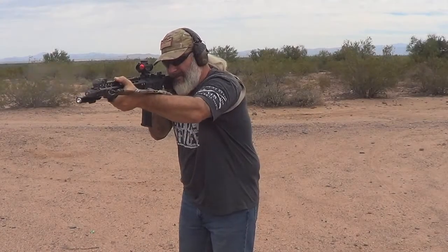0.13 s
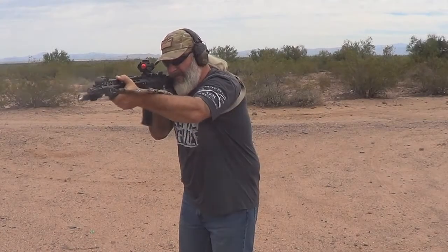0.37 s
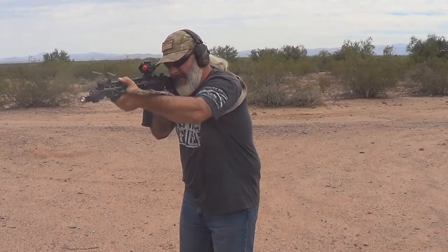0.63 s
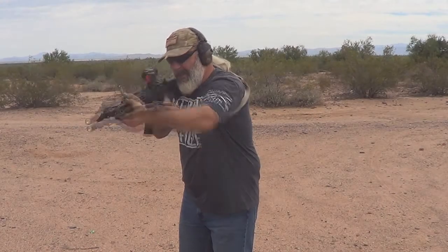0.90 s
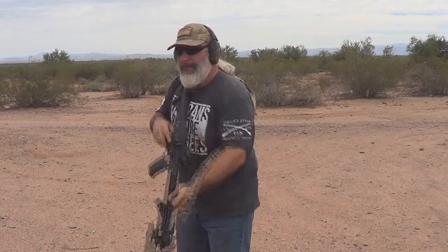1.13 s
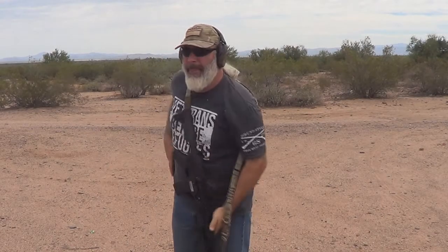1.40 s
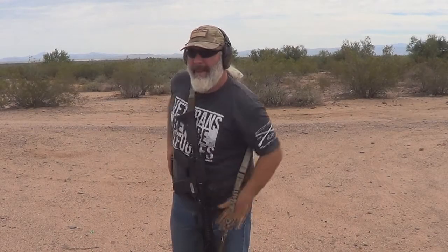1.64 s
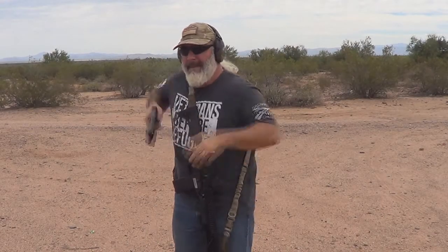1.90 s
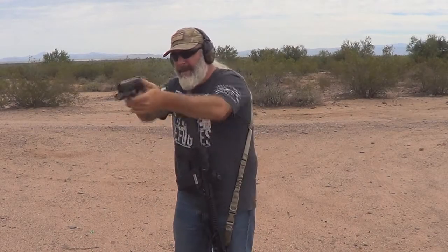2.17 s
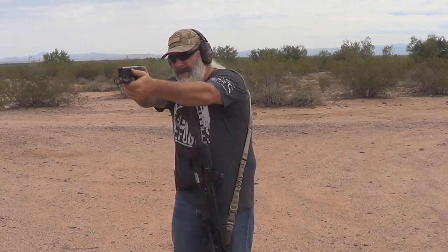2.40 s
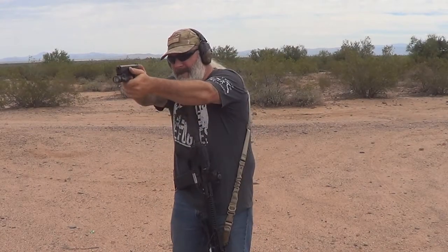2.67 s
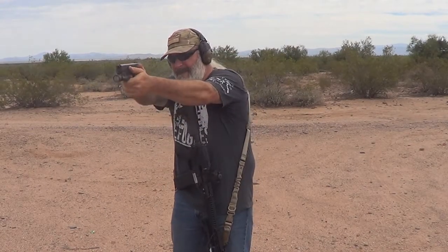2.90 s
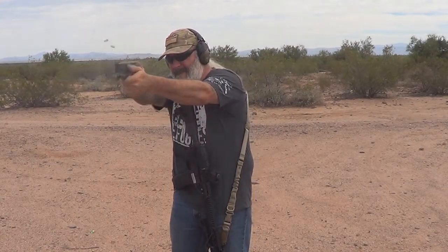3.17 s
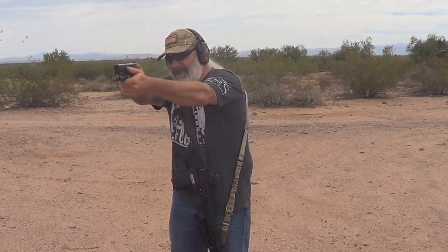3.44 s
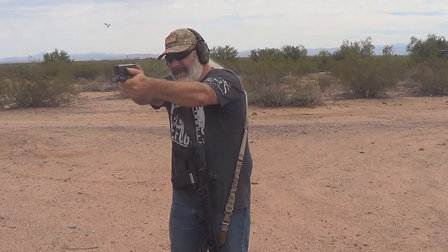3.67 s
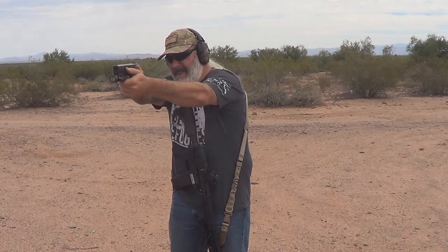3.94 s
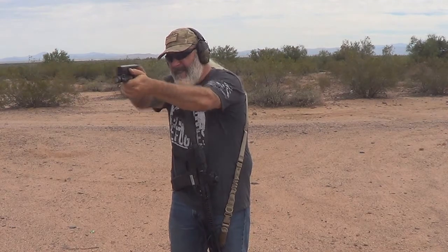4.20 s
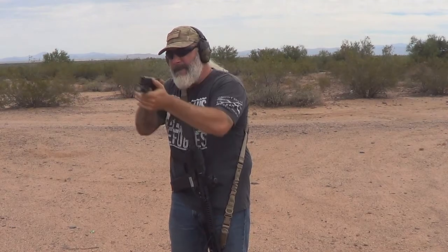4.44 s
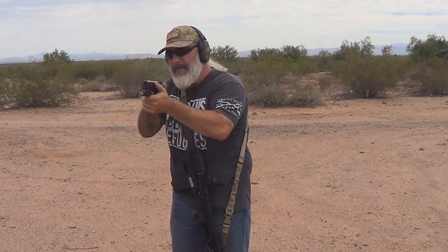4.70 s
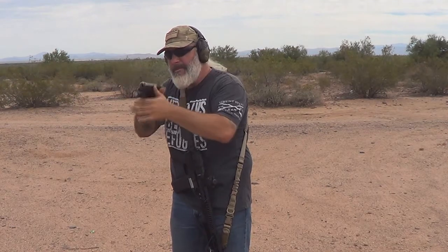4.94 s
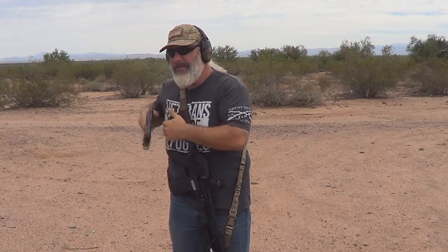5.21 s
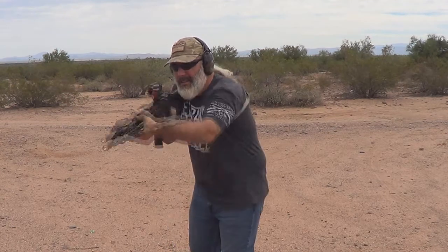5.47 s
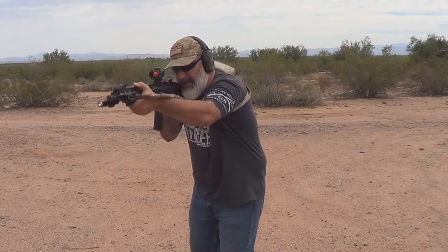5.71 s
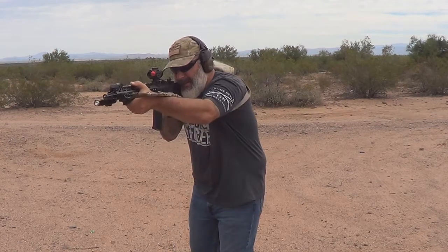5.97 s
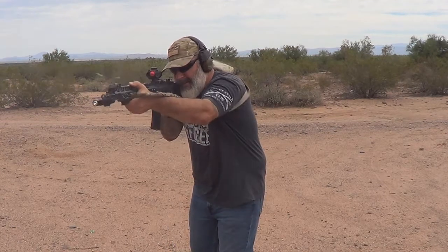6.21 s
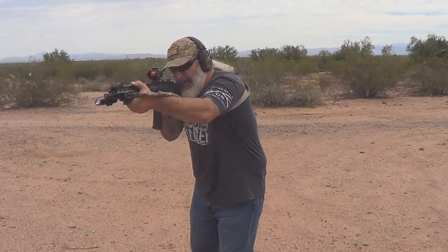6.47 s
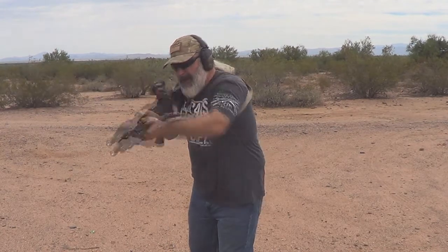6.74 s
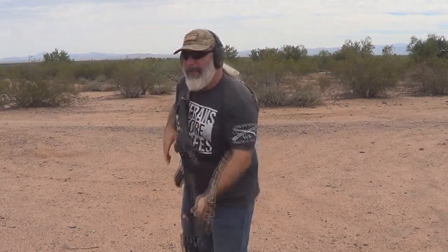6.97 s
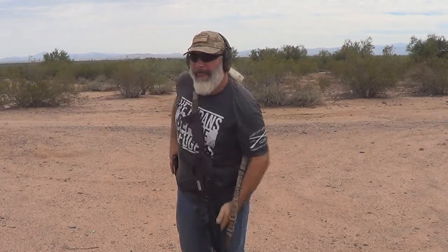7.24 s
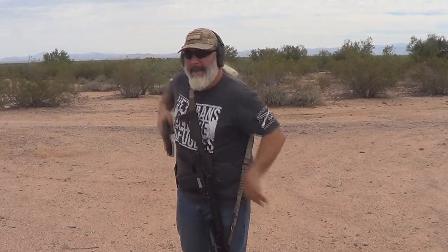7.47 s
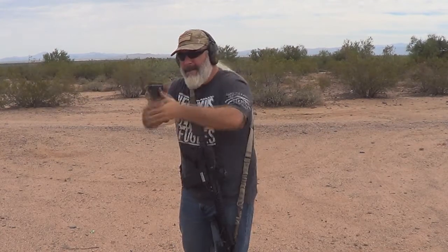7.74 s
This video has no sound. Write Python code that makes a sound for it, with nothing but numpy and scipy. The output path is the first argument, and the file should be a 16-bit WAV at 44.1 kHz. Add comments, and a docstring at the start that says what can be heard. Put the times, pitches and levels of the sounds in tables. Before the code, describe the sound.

Open desert, close stereo camera microphone, light hiss, a faint very high whine and soft wind. At 0.3, 0.5 and 0.7 s three rifle shots snap out, bullet crack just ahead of the blast, each striking a steel plate to the left with a hard smack and shimmering, wavering ring. Echo and low roll fade while brass ticks and tinkles from 1.05 to 1.45 s. Cloth rubs and gear knocks at 1.86 s; a distant shot pops at 2.0 s and rolls away, with small knocks after. Pistol shots bang at 2.9, 3.25 and 3.65 s; the first and third ring the steel, the second misses, with sharp slaps afterwards. Brass clicks around 3.5, 4.1 and 4.5 s, then quiet. Light gear sounds at 5.5 s as wind rises. Three faster rifle shots at 6.3, 6.45 and 6.6 s all clang. Brass tinkles from 7.05 s, and a sharp gear knock comes at 7.5 s.

```python
"""Steel plate in the desert

Rifle, pistol and rifle again, three shots each, on open ground near a stereo camera microphone. Shots are shaped
noise with slaps, land echo and a low roll; most bullets ring a steel plate to the left, built from decaying sines.
Brass cases tick and ring, gear knocks, cloth rubs, and someone fires far away, over wind, hiss and thin tones.
The microphone's bass cut comes first, then the camera's fast limiter squashes the blasts and recovers quickly."""
import sys
import numpy as np
from scipy import signal
from scipy.fft import rfft, irfft, next_fast_len
from scipy.io import wavfile
from scipy.ndimage import uniform_filter1d, minimum_filter1d, map_coordinates

SR = 44100
rng = np.random.default_rng(int(sys.argv[2]) if len(sys.argv) > 2 else 0)


def gain_from_decibels(decibels):
    """Convert decibel values to linear amplitude factors."""
    exponent = np.asarray(decibels, float) / 20
    return 10 ** exponent


def waveform_to_disk(signal):
    """Save audio, clipped to [-1, 1], as 16-bit WAV at the path in sys.argv[1]."""
    frames = np.transpose(np.atleast_2d(signal))
    scaled = np.clip(frames, -1, 1) * 32767
    samples = np.round(scaled).astype(np.int16)
    wavfile.write(sys.argv[1], SR, samples)


N = 347067
T = np.arange(N) / SR  # seconds

# All levels are those at the microphone, ahead of bass cut and limiter. Spectra give only the shape of a noise.

# background by passage: start_s, hiss_db, whine_db, sag_db_per_s
PASSAGES = [(0, -54.5, -60, 3), (1.95, -63.5, -71, 0.2), (5.41, -51.5, -55.5, 4), (6.3, -56, -65.5, 4)]
# wind level over time: time_s, level_db
WIND_LEVELS = [(0, -66), (1.94, -66), (1.96, -57.5), (5.405, -72), (5.412, -43.5), (6.3, -40.5), (7.6, -55),
               (7.87, -49)]
# spectrum of wind on the microphone: pitch_hz, density_db
WIND_SPECTRUM = [(15, -45.5), (25, -14.5), (135, -5.5), (238, -8.5), (570, -21.5), (882, -26.5), (972, -36),
                 (1200, -29.5), (1560, -67), (2640, -120)]
# likeness of left and right wind, held within -1 to 1: pitch_hz, likeness
WIND_ALIKE = [(60, 0.79), (180, 0.77), (550, -0.076), (1650, -2.8), (4970, 0.55), (15000, 1)]
# spectrum of the hiss: pitch_hz, density_db
HISS_SPECTRUM = [(59, -50.5), (100, -14), (922, -13), (1050, -11.5), (1190, -17), (1440, -13.5),
                 (8510, -20.5), (14500, -24.5), (15500, -13), (16500, -21.5)]
LUMPS_DB = 1.5  # unevenness of the wind
WHINE_HZ = 15734
# faint falling tone: time of its top, pitch and level there, and where it is cut
TONE_S, TONE_HZ, TONE_DB, TONE_END_S = 4.7, 1110, -62, 5.41
TONE_GLIDE, TONE_RISE, TONE_FALL = 88, 105, 10.2  # Hz per s, dB per s, dB per s

# knocks of holster, sling and gear, late slaps after the missed shot: start_s, level_db, pitch_hz, left_over_right_db
GEAR = [(0.054, -35.5, 530, 5), (1.86, -35, 820, 0), (2.173, -33.5, 7330, -3), (2.386, -34, 903, 2.1),
        (2.438, -36, 950, 2.1), (2.6549, -39, 3816, -21.5), (3.288, -19.5, 9000, 8), (3.265, -17, 900, 2),
        (3.286, -16, 817, 2.5), (3.372, -26.5, 1500, 3), (3.383, -24, 2012, 4), (3.4167, -10, 1830, -4.5),
        (3.616, -29, 5000, 6.5), (4.83, -52, 900, 2.1), (5.025, -49.5, 800, 3), (5.169, -53.5, 620, 3),
        (5.4503, -37.5, 9000, 6.7), (5.5203, -36.5, 10000, 1.1), (5.586, -38, 8000, -3),
        (6.177, -41.5, 8090, -3.5), (7.087, -38.5, 1500, 5), (7.5263, -23.5, 5510, -2.5),
        (7.53, -27, 1407, -1), (7.537, -27.5, 817, 0), (7.566, -40, 4500, -2.5), (7.697, -49, 5000, 0.1),
        (7.7078, -41, 9030, -4), (7.73, -52, 7610, 0.5)]
# how long a knock lasts: pitch_hz, t60_s
GEAR_T60 = [(500, 0.041), (2000, 0.0064), (9000, 0.0093)]
# cloth and sling rubbing: peak_s, level_db
RUSTLE = [(1.855, -39), (5.45, -56.5), (5.6, -48.5), (7.51, -41.5)]
# spectrum of rubbing cloth: pitch_hz, density_db
CLOTH_SPECTRUM = [(88, -44.5), (150, -8.5), (566, -12.5), (790, -0.5), (979, -29.5), (1560, -6.5),
                  (2810, -14), (16000, -22.5)]
RUB_RISE, RUB_FALL = 160, 330  # dB per s

# near shots; only rifle bullets crack ahead of the muzzle: start_s, blast_db, echo_db, crack_lead_s, crack_db
SHOTS = [(0.2761, 17, -4.5, 0.0047, -2.5), (0.4845, 13, -7, .0056, -9.5), (0.7087, 14.5, -4.5, .003, -14.5),
         (2.873, 18.5, -2.5, None, None), (3.2408, 5, -9.5, None, None), (3.6588, 6.5, -8.5, None, None),
         (6.2808, 19, -2.5, 0.0049, -2.5), (6.4601, 14.5, -5, 0.0044, 0), (6.6223, 13, -3, 0.0076, -9)]
# spectrum of the bullet crack: pitch_hz, density_db
CRACK_SPECTRUM = [(1000, -15), (4000, 0.5), (9000, 4), (16000, -12)]
# spectrum of the muzzle blast: pitch_hz, density_db
BLAST_SPECTRUM = [(40, -33), (200, -14), (700, -5), (2000, -1.5), (5500, 5), (9500, 4), (13000, -4),
                  (16500, -21), (20000, -35.5)]
# single echoes off ground, berm and shed, about these delays and levels: delay_s, under_blast_db, pulse_ms
SLAPS = [(.005, -12, .1), (.009, -11.5, .2), (0.02, -8.5, 0.41), (0.028, -23.5, .3), (0.035, -19, .3),
         (.046, -22, .35), (.068, -26.5, .3), (0.172, -23.5, 0.11)]
# spectrum of the echo as it sets out: pitch_hz, density_db
ECHO_SPECTRUM = [(24, -79), (40, -44), (85, -59), (211, -24), (417, -5.5), (1010, -3.5), (1670, -8.5),
                 (3830, -14.5), (9720, -18.5), (14500, -32.5), (16500, -58)]
# likeness of the echo left and right: pitch_hz, likeness
ECHO_ALIKE = [(60, 0.077), (180, 0.11), (550, 0.79), (1650, 0.13), (4970, 0.86), (15000, 0.27)]
# lean of the echo: pitch_hz, left_over_right_db
ECHO_PAN = [(60, -2), (180, -1.5), (550, 3), (1650, 2), (4970, 3.5), (15000, -1)]
# extra loss over the long way through the air: pitch_hz, loss_db_per_s
AIR_LOSS = [(100, 1.5), (400, 17), (1200, 13), (3000, 12), (7000, 26), (12000, 80)]
# spectrum of the low roll: pitch_hz, density_db
ROLL_SPECTRUM = [(30, -22.5), (120, -13.5), (280, 1), (500, -6), (900, -20.5), (2000, -46.5)]
# quick and slow part of the land's answer: dB, dB per s
GROUND_DB, GROUND_FALL, SCRUB_DB, SCRUB_FALL = 17.5, 1080, -5.5, 81
# a late swell: centre, top, dB lost one second off centre (square law)
RIDGE_S, RIDGE_DB, RIDGE_BEND = 0.68, -29, 47.4
# the roll builds, holds, then falls ever faster
ROLL_TOP_DB, ROLL_RISE_S, ROLL_HOLD_S, ROLL_BEND = -8.5, 0.1, 0.4, 52
RIFLE_ROLL_DB, PISTOL_ROLL_DB = -25, -31  # roll against the echo

# bullets on the plate: start_s, level_db, swing_pace (1 = usual)
HITS = [(0.3117, -15, 1), (0.5224, -14.5, 0.59), (0.7437, -12.5, 0.89), (2.9129, -5.5, 1.4),
        (3.6948, -11.5, 1.06), (6.3157, -13.5, 1.2), (6.4987, -13.5, 1.03), (6.663, -7, 0.81)]
# where each bullet lands on the plate: across (0-1), up (0-1)
LANDS = [(0.695, 0.238), (0.174, 0.733), (0.799, 0.179), (0.557, 0.445), (0.936, 0.067), (0.172, 0.08),
         (0.211, 0.705), (0.633, 0.699)]
# strong modes of the plate: pitch_hz
PLATE_HZ = [(509.5), (607), (649), (872), (986.5), (1356), (1636), (1683), (1862), (1974), (2635), (3580),
            (3790), (4070), (4468), (4574), (4770), (4975), (5520), (5914), (6207), (6378), (6564), (7200),
            (7456), (7652), (8220), (8700), (8974), (10860), (11940), (13155)]
# each mode: level_db where it moves most, t60_s, beats_per_s at usual pace, beat_depth (0-1),
# dip_s (a beat's dip after the hit, at usual pace)
PLATE = [(-6, 1.01, 2.4, 0.2, 0.014), (2.5, 0.63, 2.4, 0.7, -0.089), (-8.5, 2.2, 2.3, 0.5, 0.31),
         (10, 0.41, 0.98, 0, 0.047), (21.5, 1.053, 1.83, 0.35, 0.036), (4, 0.48, 2.5, 0.5, -0.044),
         (6.5, 0.96, 1.53, 0.85, 0.32), (16, 0.23, 1.4, 0.3, 0.0018), (10.2, 0.35, 1.7, 0.5, -0.101),
         (9.5, 1.036, 2.98, 0.1, 0.32), (0, 0.63, 10, 0.7, -0.35), (15, 0.23, 1.8, 0.5, -0.085),
         (3.5, 0.83, 1.2, 0.3, -0.17), (-2, 0.81, 2.5, 0.3, -0.071), (3.5, 0.29, 1.8, 0, 0.004),
         (13.5, 0.37, 0.71, 0.6, -0.27), (-3.5, 0.61, 3.3, 0.4, 0.15), (7, 0.29, 1.8, 0.54, -0.12),
         (4.5, 0.27, 2.9, 0.76, -0.03), (4, 0.35, 1.6, 0.5, -0.01), (9.5, 0.25, 1.6, 0.45, 0.034),
         (-0.5, 0.85, 1.2, 0.1, -0.014), (11, 0.28, 0.8, 0.3, -0.092), (8.5, 0.21, 1.4, 0.6, -0.18),
         (2, 0.29, 2.2, 0.45, -0.065), (-8, 0.88, 1.2, 0.4, -0.19), (-9, 0.56, 1.4, 0.45, 0.369),
         (-6.5, 0.56, 5, 0.56, -0.014), (-5.5, 0.21, 1.6, 0.33, -0.135), (-12.5, 0.75, 3.2, 0.29, -0.31),
         (-7, 0.27, 1.6, 0.45, 0.004), (-19, 0.6, 2.0, 0.45, -0.125)]
# an assumed shape for each mode: node_lines_across, node_lines_up
NODES = [(3, 4), (5, 4), (6, 2), (8, 6), (8, 5), (8, 4), (7, 1), (3, 2), (7, 1), (6, 8), (4, 1), (8, 3),
         (7, 8), (1, 1), (3, 7), (2, 8), (1, 3), (6, 2), (0, 7), (3, 6), (5, 5), (2, 1), (3, 5), (7, 3),
         (7, 1), (2, 5), (5, 1), (2, 1), (6, 7), (0, 1), (7, 1), (1, 5)]
# left ahead of right: pitch_hz, lead_rad
PLATE_LEAD = [(600, .7), (2000, -1), (5500, 0.8), (8000, -.4), (14000, .1)]
# the plate lies to the left: pitch_hz, left_over_right_db
PLATE_PAN = [(500, 2.5), (1000, 5), (1700, 8.5), (2100, 1.5), (4400, 4.5), (5000, 12), (6500, 20),
             (7600, 20), (8300, 11), (13000, 5.5)]
# how slowly the ringing builds up: pitch_hz, rise_s
SWELL = [(600, 0.06), (2000, 0.017), (4000, .025), (7000, .012), (13000, .01)]
# weaker modes, at chance strengths: pitch_hz
MINOR_HZ = [(2030), (2505), (2775), (3265), (3370), (4025), (4920), (5015), (5345), (5435), (5780), (5960),
            (6790), (7075), (7280), (7755), (7855), (8090), (8415), (9150), (9385), (9475), (9580), (9855),
            (9915), (10315), (10610), (10725), (10775), (11665), (12850), (13040), (13825), (13935),
            (14015), (14350), (14740), (15060), (15150), (15525)]
# their middle level: pitch_hz, level_db
MINOR_DB = [(2000, -10.5), (5000, -11.5), (9500, -15.5), (12000, -16.5), (15500, -31.5)]
# their decay: pitch_hz, t60_s
MINOR_T60 = [(2000, 0.18), (8000, 0.55), (15500, .3)]
ON_NODE = 0.019  # movement added everywhere, all that is left on a node line
MINOR_LUCK_DB = 3.5  # spread of the weaker modes from hit to hit
WAVER_DB, WAVER_PER_S = 2.5, 9  # chance wavering of the strong modes as the plate wobbles

# brass bouncing; the end that lands decides which mode rings: start_s, tick_db, ring_db, lower_over_upper_db
CASES = [(1.059, -51.5, -48.5, -13), (1.18, -45.5, -59, -8), (1.269, -40.5, -45.5, -15),
         (1.4503, -27, -42.5, -17), (3.5318, -17, -69.5, 6.5), (4.113, -12, -68, -0.5),
         (4.4936, -20, -70, -4), (4.7142, -46, -78.5, .1), (5.004, -47, -80, -0.5),
         (7.057, -38.5, -51, -10), (7.1967, -35.5, -48, -13), (7.25, -42, -70.5, 3),
         (7.3653, -22.5, -37.5, -12), (7.44, -45, -53.5, -11), (7.5562, -40.5, -40.5, -25),
         (7.5817, -51, -61, 20.5)]
# lower and upper mode of a case, before a chance shift: pitch_hz
BRASS_HZ = 10750, 15000
# decay of the two modes: t60_s
BRASS_T60 = .16, .25

# arrivals of the far shot: start_s, level_db, pitch_hz, t60_s, left_over_right_db
FAR = [(1.992, -7, 2600, 0.013, 9.5), (1.9925, -22.5, 546, 0.046, 3), (2.019, -16, 2580, 0.026, -5.5),
       (2.036, -19, 2530, 0.012, -7), (2.04, -22, 714, 0.033, 6.5), (2.054, -25, 547, 0.037, 2),
       (2.0939, -17.5, 380, 0.028, 4), (2.094, -20.5, 3440, 0.0049, 7.5)]
# its roll from low ground, a hill and scrub: peak_s, level_db, rise_db_per_s, fall_db_per_s, left_over_right_db
FAR_ROLL = [(2.17, -40.5, 16.5, 46.5, -1), (2.356, -38, 58.5, 78, 2.5), (1.975, -30.5, 92, 42, 6)]
# spectra of the three rolls: pitch_hz, density_db
FAR_BANDS = [
    [(30, -58), (100, -18.5), (250, 8), (500, -3), (800, -33)],
    [(100, -60), (450, -11.5), (750, 4), (1150, 0), (1800, -42.5)],
    [(100, -3), (1000, -4.5), (2500, -3), (5500, -14), (7500, -28), (16000, -66.5)],
]
FAR_S, FAR_END_S = 1.99, 2.86  # span of the far roll


def unit(x):
    """Scaled to rms 1."""
    return x / np.sqrt(np.mean(x ** 2) + 1e-20)


def along(points, hz):
    """Reads (Hz, value) points on a log pitch axis."""
    f, value = np.transpose(points)
    return np.interp(np.log(hz + 1), np.log(f + 1), value)


def peak(t, s, db, rise, fall):
    """A level in dB that climbs to a top at s and sinks again."""
    return db - rise * np.maximum(s - t, 0) - fall * np.maximum(t - s, 0)


def sides(db):
    """Left and right gains for a level difference."""
    return gain_from_decibels([[db / 2], [-db / 2]])


def add(out, s, sound):
    """Mixes a stereo sound in at time s."""
    part = out[:, round(s * SR):][:, :sound.shape[1]]
    part += sound[:, :part.shape[1]]


def rush(size, spectrum, alike, patchy_db=0., loss=None, pan=((1, 0),)):
    """Stereo noise, patchy in time and pitch; rms 1, or rms 1 over its first quarter second if loss dulls it."""
    hz, t, z = signal.stft(rng.standard_normal((2, size + 256)), SR, nperseg=256)
    patches = uniform_filter1d(rng.standard_normal(z.shape[1:]), size=7, axis=0)
    patches = unit(uniform_filter1d(patches, size=5, axis=1))
    # likeness sets the share of common (mid) and opposed (side) noise
    turn = np.arccos(np.clip(along(alike, hz), -1, 1))[:, None] / 2
    mid, side = z[0] * np.cos(turn), z[1] * np.sin(turn)
    lean = along(pan, hz)[:, None] / 2
    z = np.array([(mid + side) * gain_from_decibels(lean), (mid - side) * gain_from_decibels(-lean)])
    z = z * gain_from_decibels(patchy_db * patches)
    if loss:
        z = z * gain_from_decibels(-along(loss, hz)[:, None] * t)
    x = signal.istft(z, SR, nperseg=256)[1]
    padded = next_fast_len(size + 8192)
    colour = gain_from_decibels(along(spectrum, np.fft.rfftfreq(padded, 1 / SR)))
    x = irfft(rfft(x, padded) * colour, padded)[:, :size]
    start = x[:, :SR // 4 if loss else size]
    return x / np.sqrt(np.mean(start ** 2))


def burst(hz, t60, alike=1.0, rise=.0002):
    """A puff of noise around one pitch that rises at once and falls 60 dB in t60 seconds."""
    t = np.arange(round(t60 * SR) + 64) / SR
    band = [(hz / 16, -60), (hz / 4, -26), (hz / 1.39, 0), (hz * 1.1, 0), (hz * 4, -30), (hz * 16, -70)]
    return rush(len(t), band, [(1, alike)]) * gain_from_decibels(-60 * t / t60) * (1 - np.exp(-t / rise))


def ambience():
    """Lumpy wind noise on the microphone, smooth hiss, a steady high whine and a falling tone."""
    rows = np.array(PASSAGES)
    start, hiss_db, whine_db, sag = rows[np.searchsorted(rows[1:, 0], T)].T
    sag_db = sag * (T - start)
    lumps = map_coordinates(rng.standard_normal(200), [T * 14])
    wind_at_s, wind_at_db = np.transpose(WIND_LEVELS)
    wind_db = np.interp(T, wind_at_s, wind_at_db) + LUMPS_DB * lumps
    wind = gain_from_decibels(wind_db) * rush(N, WIND_SPECTRUM, WIND_ALIKE, patchy_db=2.0)
    hiss_alike = [(300, .5), (1500, 0.27), (5000, 0.37), (15000, .9)]
    hiss = gain_from_decibels(hiss_db - sag_db) * rush(N, HISS_SPECTRUM, hiss_alike)
    whine = gain_from_decibels(whine_db - sag_db) * np.sin(2 * np.pi * WHINE_HZ * T)
    tone_hz = TONE_HZ - TONE_GLIDE * (T - TONE_S)
    falling = np.sin(2 * np.pi * np.cumsum(tone_hz) / SR) * (T < TONE_END_S)
    falling = falling * gain_from_decibels(peak(T, TONE_S, TONE_DB, TONE_RISE, TONE_FALL))
    return wind + hiss + whine + falling


def handling():
    """Knocks of holster and sling as short bursts, over grainy noise of rubbing cloth."""
    rubs = sum(gain_from_decibels(peak(T, s, db, RUB_RISE, RUB_FALL)) for s, db in RUSTLE)
    out = rubs * rush(N, CLOTH_SPECTRUM, [(1, 0.96)], patchy_db=6.5)
    for s, db, hz, pan_db in GEAR:
        add(out, s, gain_from_decibels(db) * burst(hz, along(GEAR_T60, hz)) * sides(pan_db))
    return out


def bullet_crack(t):
    """The crack of a rifle bullet: a short hump of bright noise."""
    hump = np.exp(-((t - .0015) / 0.0027) ** 2)
    return hump * rush(len(t), CRACK_SPECTRUM, [(1, 0.96)])


def muzzle_blast(t):
    """The bang, then scatter from the ground around: noise under two quick decays."""
    fade = gain_from_decibels(-60 * t / 0.04) + gain_from_decibels(-60 * t / 0.05)
    return fade * rush(len(t), BLAST_SPECTRUM, [(1, .75)], patchy_db=1.0) * sides(1.0)


def slap(t, ms):
    """A single echo of the blast: a push and the suction behind it."""
    u = t / ms * 1000
    return u * (2 - u) * np.exp(-u) * sides(2.3)


def land_echo(t):
    """Answer of ground, scrub and ridge: noise with a quick fall, a slow fall and a late swell, dulled by air."""
    land = gain_from_decibels(GROUND_DB - GROUND_FALL * t) + gain_from_decibels(SCRUB_DB - SCRUB_FALL * t)
    land = land + gain_from_decibels(RIDGE_DB - RIDGE_BEND * (t - RIDGE_S) ** 2)
    return land * rush(len(t), ECHO_SPECTRUM, ECHO_ALIKE, patchy_db=3.0, loss=AIR_LOSS, pan=ECHO_PAN)


def hill_roll(t):
    """Low roll from far hills: deep patchy noise that builds, holds and falls ever faster."""
    hills = gain_from_decibels(ROLL_TOP_DB - ROLL_BEND * np.maximum(t - ROLL_HOLD_S, 0) ** 2)
    hills = hills * (1 - np.exp(-t / ROLL_RISE_S))
    return hills * rush(len(t), ROLL_SPECTRUM, [(100, 0.81), (400, 0.94)], patchy_db=3.5)


def shots():
    """Each near shot: bullet crack for the rifle, muzzle blast, slaps, the land's answer and the low roll."""
    out, t = np.zeros((2, N)), np.arange(round(1.6 * SR)) / SR
    near = t[:SR // 8]
    for s, db, echo_db, lead, crack_db in SHOTS:
        if lead:
            add(out, s - lead - .001, gain_from_decibels(crack_db) * bullet_crack(near))
        add(out, s, gain_from_decibels(db) * muzzle_blast(near))
        for (delay, slap_db, ms), luck in zip(SLAPS, rng.normal(0, 1, (len(SLAPS), 2))):
            slap_gain = gain_from_decibels(db + slap_db + 0.86 * luck[1])
            add(out, s + delay + 0.0014 * luck[0], slap_gain * slap(near[:SR // 100], ms))
        add(out, s, gain_from_decibels(echo_db) * land_echo(t))
        roll_db = RIFLE_ROLL_DB if lead else PISTOL_ROLL_DB
        add(out, s, gain_from_decibels(echo_db + roll_db) * hill_roll(t))
    return out


def strong_modes(out):
    """A bullet starts each mode by how much it moves at that spot; the modes beat as the plate swings."""
    for hz, (level, t60, beats, depth, dip), (across, up) in zip(PLATE_HZ, PLATE, NODES):
        t = np.arange(round(min(t60, 2) * SR)) / SR
        lead = along(PLATE_LEAD, hz) * np.array([[.5], [-.5]])
        ring = gain_from_decibels(-60 * t / t60) * np.sin(2 * np.pi * hz * t + lead)
        ring = ring * (1 - np.exp(-t / along(SWELL, hz))) * sides(along(PLATE_PAN, hz))
        for (s, db, pace), (x, y) in zip(HITS, LANDS):
            moves = abs(np.cos(np.pi * across * x) * np.cos(np.pi * up * y)) + ON_NODE
            swing = 1 - np.clip(depth, 0, 1) * np.cos(2 * np.pi * beats * (pace * t - dip))
            waver = map_coordinates(rng.standard_normal(24), [t * WAVER_PER_S], order=2)
            add(out, s, gain_from_decibels(db + level + WAVER_DB * waver) * moves * swing * ring)


def weak_modes_and_smack(out):
    """Decaying sines at chance strengths form a shimmer under the noisy smack of lead on steel."""
    t = np.arange(round(.6 * SR))[:, None] / SR
    minor = np.array(MINOR_HZ)
    shimmer_db = along(MINOR_DB, minor) - 60 * t / along(MINOR_T60, minor)
    shimmer = gain_from_decibels(shimmer_db) * np.sin(2 * np.pi * minor * t)
    for (s, db, _), luck in zip(HITS, rng.normal(0, 1, (len(HITS), len(minor)))):
        add(out, s, gain_from_decibels(db) * (shimmer @ gain_from_decibels(MINOR_LUCK_DB * luck)) * sides(3.1))
        add(out, s, gain_from_decibels(db - 6.0) * burst(hz=5000, t60=0.14, alike=0.62) * sides(4.))


def plate():
    """Each bullet smacks the steel and sets its strong and weak modes ringing."""
    out = np.zeros((2, N))
    strong_modes(out)
    weak_modes_and_smack(out)
    return out


def cases():
    """Spent brass ticks on the grit and rings very high in two modes, fluttering as it tumbles."""
    out, t = np.zeros((2, N)), np.arange(SR // 4) / SR
    for s, tick_db, ring_db, lower_db in CASES:
        add(out, s, gain_from_decibels(tick_db) * burst(hz=8300, t60=0.0055) * sides(2.5))
        flutter = 1 + 0.27 * np.sin(2 * np.pi * rng.uniform(25, 45) * t)
        for hz, t60, db in zip(BRASS_HZ, BRASS_T60, (lower_db, 0)):
            mode = np.sin(2 * np.pi * hz * rng.normal(1, 0.0073) * t)
            add(out, s, gain_from_decibels(ring_db + db - 60 * t / t60) * flutter * mode * sides(-8.0))
    return out


def far_shot():
    """A distant shot: crack, repeats and thump as bursts, then its roll over the land as banded noise."""
    out = np.zeros((2, N))
    for s, db, hz, t60, pan_db in FAR:
        add(out, s, gain_from_decibels(db) * burst(hz, t60, rise=.0003) * sides(pan_db))
    t = T[(T > FAR_S) & (T < FAR_END_S)]
    for (*shape, pan_db), band in zip(FAR_ROLL, FAR_BANDS):
        roll = gain_from_decibels(peak(t, *shape)) * rush(len(t), band, ECHO_ALIKE, patchy_db=2.7)
        add(out, FAR_S, roll * sides(pan_db))
    return out


def scene():
    """All sources at the microphones."""
    return ambience() + handling() + shots() + plate() + cases() + far_shot()


def limiter(x, top_db, ahead, release_db, share):
    """Turns both sides down just before a peak, by a share of the excess, and recovers by release_db a second."""
    width = 2 * round(ahead * SR) + 1
    need = share * np.minimum(top_db - 20 * np.log10(np.abs(x).max(0) + 1e-9), 0)
    need = minimum_filter1d(need, width)
    # the gain may climb back no faster than the release
    need = np.minimum.accumulate(need - release_db * T) + release_db * T
    return x * gain_from_decibels(uniform_filter1d(np.minimum(need, 0), width))


def low_pass(x):
    """Removes everything above the highest recorded frequency."""
    return signal.sosfilt(signal.butter(12, 16800, fs=SR, output="sos"), x)


def record(dry):
    """Bass cut of the microphone, then the camera's limiter and a clip at full scale."""
    bass_cut = signal.butter(1, 160., "high", fs=SR, output="sos")
    cut = signal.sosfilt(bass_cut, dry)
    held = limiter(cut, top_db=-7.0, ahead=0.0016, release_db=885.5, share=0.81)
    return low_pass(np.clip(held, -1, 1))


dry = scene()
out = record(dry)
waveform_to_disk(out)
```